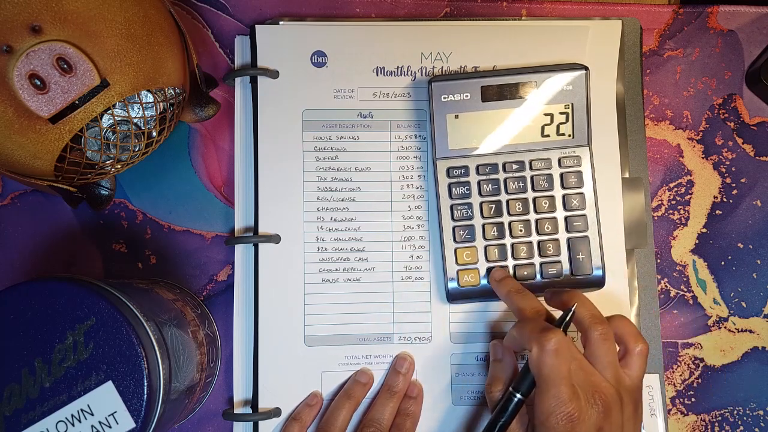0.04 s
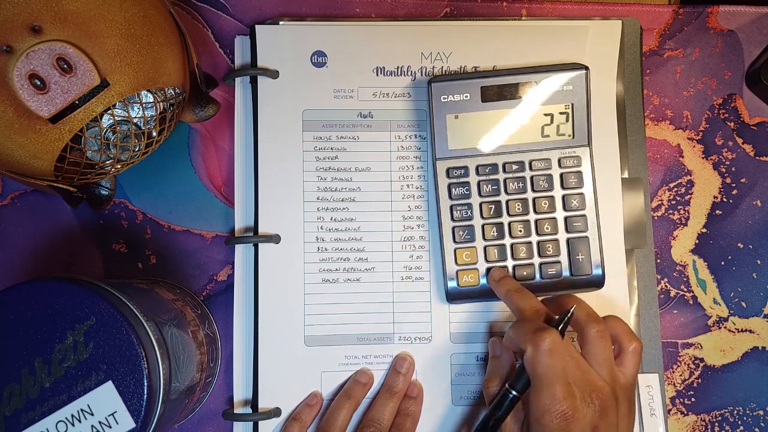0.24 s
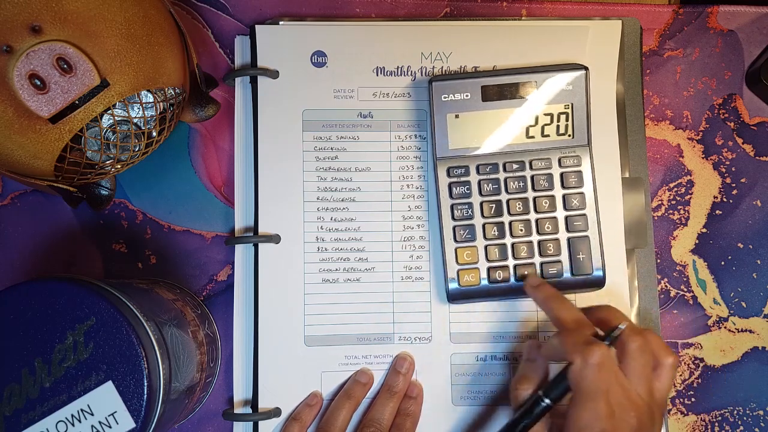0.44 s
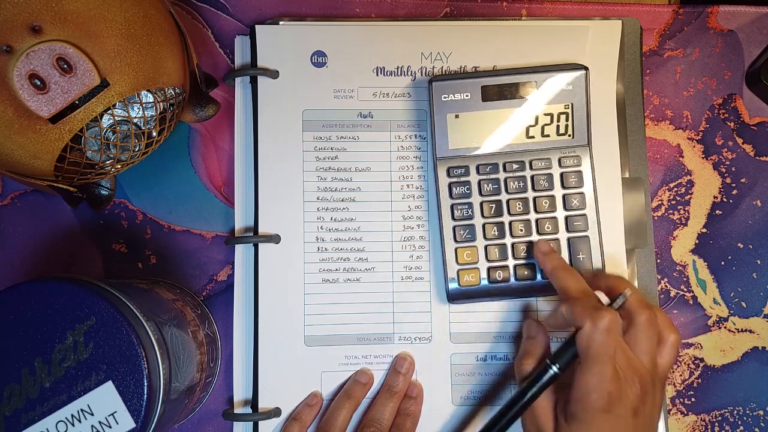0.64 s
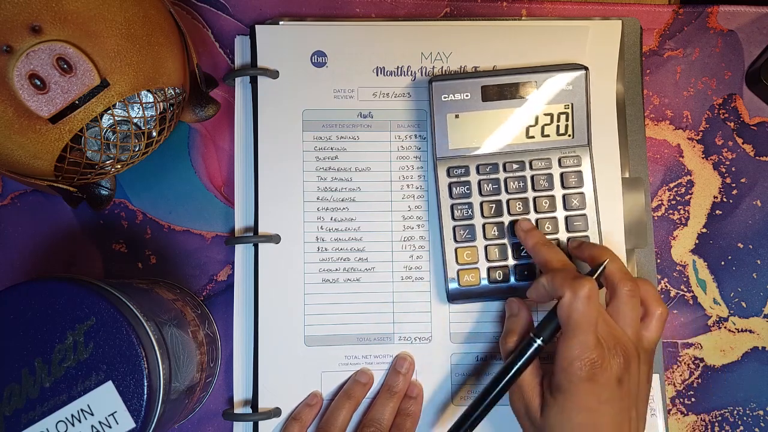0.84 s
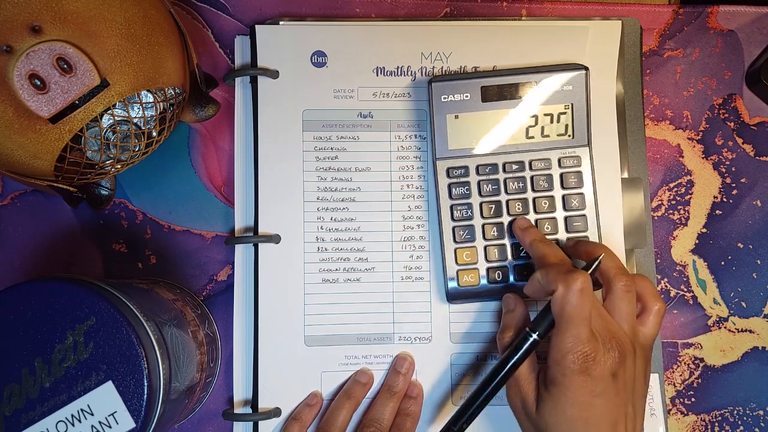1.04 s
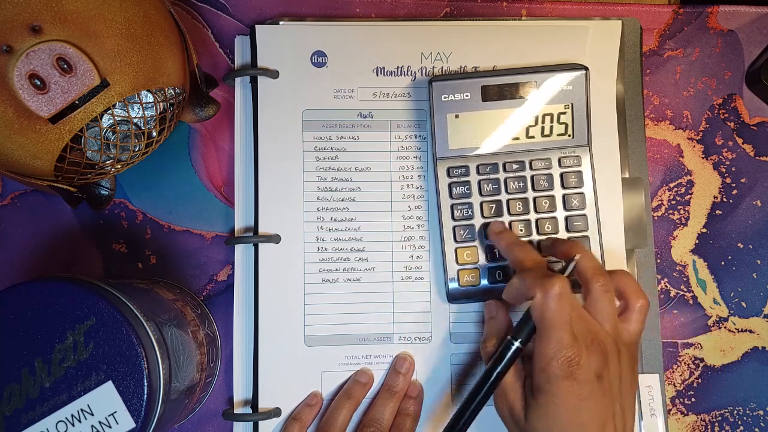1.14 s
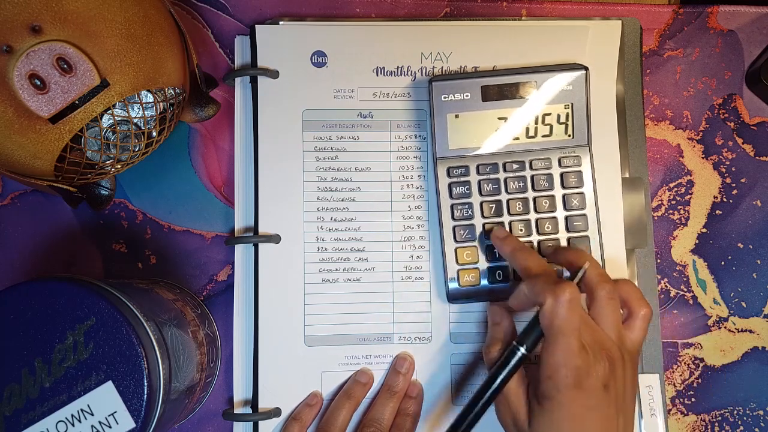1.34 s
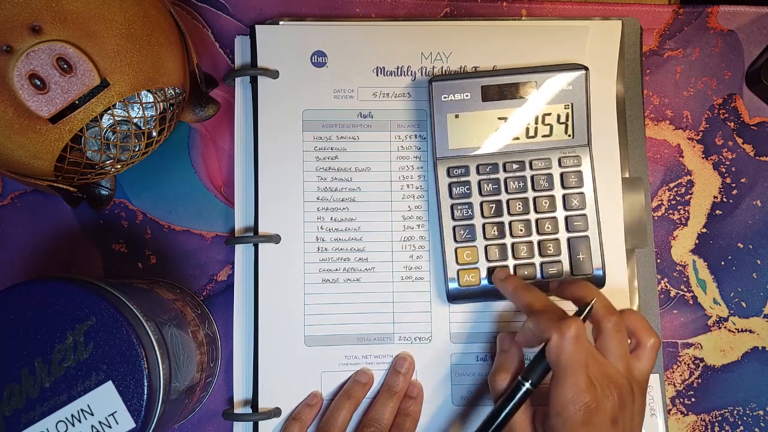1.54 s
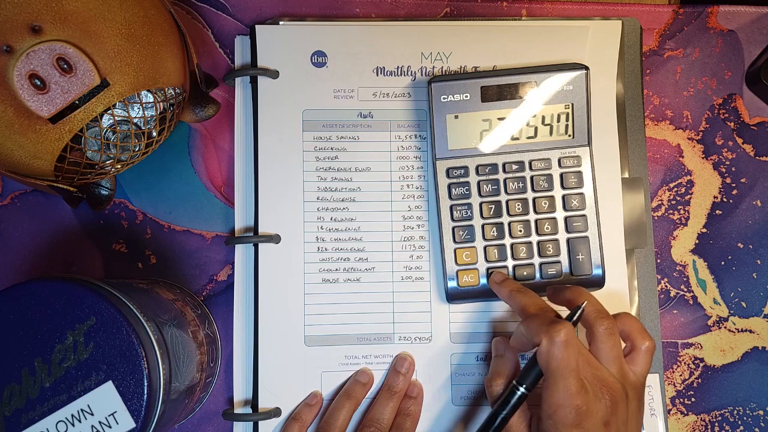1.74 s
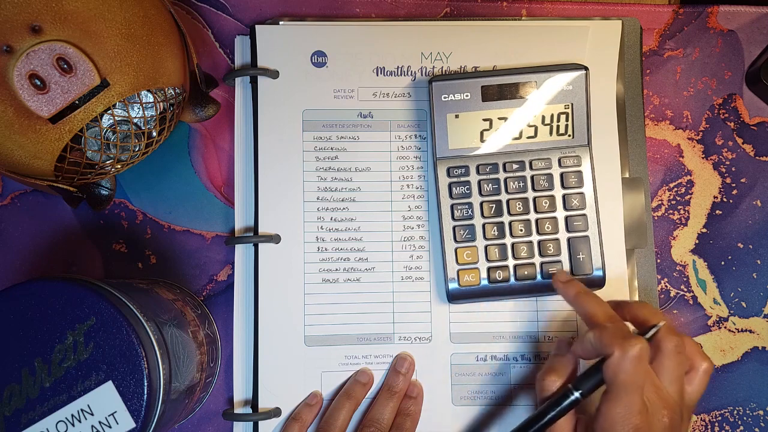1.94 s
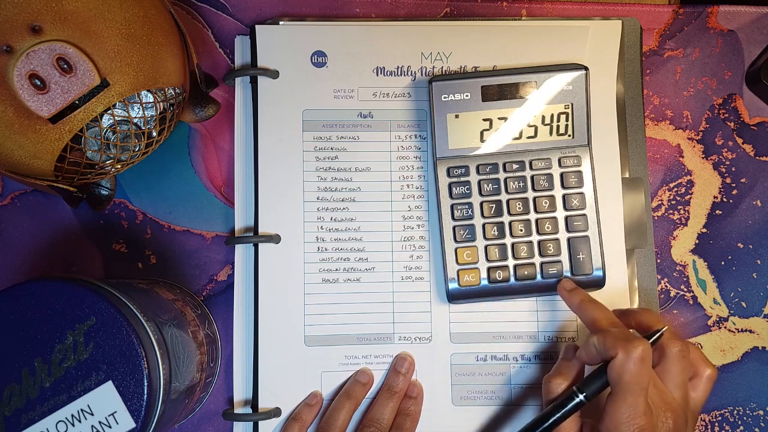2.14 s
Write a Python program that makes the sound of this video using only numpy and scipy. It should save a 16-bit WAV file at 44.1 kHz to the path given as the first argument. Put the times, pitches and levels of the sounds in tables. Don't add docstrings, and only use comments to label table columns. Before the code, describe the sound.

Fingers press the keys of a desktop calculator: four short plastic clicks with hollow knocks and soft low thumps, a pause after the first, then quicker presses; small quiet room, close phone microphone, faint hiss.

```python
import sys
import numpy as np
from scipy import signal
from scipy.fft import rfft, irfft
from scipy.io import wavfile
from scipy.ndimage import uniform_filter1d

SR = 44100
rng = np.random.default_rng(int(sys.argv[2]) if len(sys.argv) > 2 else 0)


def field_ratio(decibels):
    return 10 ** (np.asarray(decibels, dtype=float) / 20)


def bounce(signal):
    frames = np.transpose(np.atleast_2d(signal))
    limited = np.clip(frames, -1, 1)
    pcm = np.round(limited * 32767).astype(np.int16)
    wavfile.write(sys.argv[1], SR, pcm)


N = 97020


def read(points, hz):
    f, value = np.transpose(points)
    return np.interp(np.log(hz + 1), np.log(f + 1), value)


def evened(x):
    return x / np.sqrt(np.mean(x ** 2) + 1e-20)


def add(mix, s, sound):
    part = mix[round(s * SR):][:len(sound)]
    part += sound[:len(part)]


def colour(x, points):
    hz = np.fft.rfftfreq(x.shape[-1], 1 / SR)
    return irfft(rfft(x) * field_ratio(read(points, hz)), x.shape[-1])


def ring(hz, db, t60, t):
    return field_ratio(db - 60 * t / max(t60, .001)) * np.sin(2 * np.pi * hz * t)


# (frequency [Hz], level [dB])
HISS_COLOUR = [(88, -34), (150, 1), (193, -23), (314, -13.5), (530, -18), (595, -17.5), (1540, -28),
               (3910, -28.5), (15500, -31)]


def hiss():
    noise = rng.standard_normal(N)
    return field_ratio(-73.5) * evened(colour(noise, [(60, -85)] + HISS_COLOUR))


# (frequency [Hz], width [Hz], level [dB])
FAN_WHINES = [(5120, 980, -82), (3930, 110, -90)]


def fan_whine():
    hz = np.fft.rfftfreq(N, 1 / SR)
    out = np.zeros(N)
    for f, width, db in FAN_WHINES:
        band = rfft(rng.standard_normal(N)) / (1 + ((hz - f) / width) ** 2)
        out += field_ratio(db) * evened(irfft(band, N))
    return out


# (time [s], spread [s], level [dB], frequency [Hz])
RUSTLES = [
    (0.148, 0.044, -76.5, 876),
    (.43, 0.055, -66.5, 390),
    (1.27, 0.076, -61, 390),
]


def paper_rustle():
    t = np.arange(N) / SR
    out = np.zeros(N)
    for s, spread, db, f in RUSTLES:
        grain = rng.standard_normal(N) * np.exp(-((t - s) / spread) ** 2)
        band = signal.butter(2, [f * 0.38, f * 1.27], "band", fs=SR)
        out += field_ratio(db) * 5 * signal.lfilter(*band, grain)
    return out


# (time [s], effort [dB])
HAND_EFFORT = [(0, -65.5), (.12, -58.5), (.3, -51.5), (0.498, -48.5), (.6, -61), (.75, -59), (.95, -64),
               (1.099, -49.5), (1.4, -46.5), (1.598, -54.5), (1.801, -46), (2, -53.5), (2.2, -58)]
# (frequency [Hz], level [dB])
HAND_COLOUR = [(25, -5.5), (60, -5.5), (90, 4), (120, -1), (150, -12.5), (250, -18), (500, -39.5),
               (1500, -43.5)]


def shifting_hands():
    s, effort_db = np.transpose(HAND_EFFORT)
    noise = rng.standard_normal(N)
    rumble = evened(colour(noise, [(19, -20.5)] + HAND_COLOUR + [(4000, -65.5)]))
    return field_ratio(np.interp(np.arange(N) / SR, s, effort_db)) * rumble


def background():
    return hiss() + fan_whine() + paper_rustle() + shifting_hands()


# (frequency [Hz], level [dB], t60 [s])
DESK_LOW = [(85.7, 7, 0.27), (62.2, -8, 1), (35.2, -24.5, 0.49)]
DESK_HIGH = [(118.62, 5, 0.48), (171, -27.5, 0.29), (231.5, -13, 0.27)]
CONTACT_S = 0.0063
HOLD_S, LIFT_DB_PER_S = 0.158, 503


def push(way, low_db, high_db, share):
    t = np.arange(SR // 2) / SR
    force = np.sin(np.pi * np.clip(t[:2000] / CONTACT_S, 0, 1)) ** 2
    high = sum(ring(f, high_db + d, t60 * share, t) for f, d, t60 in DESK_HIGH)
    low = sum(ring(f, low_db + d, t60 * share, t) for f, d, t60 in DESK_LOW)
    stilled = field_ratio(-LIFT_DB_PER_S * np.maximum(t - HOLD_S * share, 0))
    return np.sign(way) * signal.fftconvolve(force / force.sum(), (high - low) * stilled)


# (time [s], direction [+1 or -1], low tones [dB], high tones [dB], ring time [share of t60])
DESK_PUSHES = [(0.202, 1, -44, -50, 1.28), (0.223, 1, -46, -51, 0.35), (0.344, 1, -61, -45, 1),
               (0.391, 1, -33.5, -28, 0.85), (0.801, 1, -56.5, -78, 2.1), (0.987, 1, -65, -53.5, 1),
               (1.0147, 1, -43, -40, 0.85), (1.13, 1, -33.5, -35.5, 0.42), (1.174, 1, -44, -54, 0.64),
               (1.20, 1, -38.5, -53, 0.36), (1.250, -1, -51, -31, 1.01), (1.3859, 1, -32.5, -31.5, .8),
               (1.655, 1, -45, -40, 0.93), (1.702, 1, -46, -50, 0.71), (1.795, 1, -47, -51, 0.76),
               (1.819, 1, -31.5, -29.5, 0.86)]


def desk_thumps():
    desk = np.zeros(N)
    for s, *settings in DESK_PUSHES:
        add(desk, s, push(*settings))
    return signal.lfilter(*signal.butter(2, 37.4, "high", fs=SR), desk)


# (frequency [Hz], level [dB], t60 [s])
KEY_TONES = [(1500, -5, .007), (2050, -5, .006), (2650, -5, .005), (3200, 0, .007), (3600, -2, .006),
             (4120, 0, .007), (4650, -6, .004), (5200, 0, .007), (5850, -5, .004), (6500, -5, .005),
             (7200, -5, .004), (8150, -6, .004), (9400, -10, .003), (12000, -8, .002)]
TICK_RISE_S, DETUNE = 0.0002, .012
RATTLE_SHARE, SCRAPE_S = 0.13, 0.018


def tick(db, hz, rattle, reach, chance):
    t = np.arange(1024) / SR
    hits = chance[:1024] ** 3 * (t < rattle) * RATTLE_SHARE
    hits[0] = np.exp(-(rattle / SCRAPE_S) ** 2)
    body = np.zeros(len(t))
    for k, (f, d, t60) in enumerate(KEY_TONES):
        tuned = f * (1 + DETUNE * chance[-k - 1])
        level = d - 6 * (np.log2(f / hz) / reach) ** 2
        body += ring(tuned, level, t60, t) * np.sign(chance[-k - 20])
    sound = signal.fftconvolve(hits, body * (1 - np.exp(-t / TICK_RISE_S)))
    return field_ratio(db) * sound / abs(sound).max()


# (time [s], level [dB], brightness [Hz], rattle [s], reach [octaves])
KEY_TICKS = [(0.2165, -42.5, 5000, .0012, 0.63), (0.231, -55, 3550, 0.012, 0.22),
             (.328, -53, 3550, 0.019, 0.47), (0.3417, -33.5, 3550, 0.00075, 0.38),
             (0.3468, -32, 4020, 0.0032, 1.06), (0.9797, -46, 2670, 0.00076, 0.76),
             (1.0861, -45, 3260, 0.0051, 0.98), (1.0911, -48, 3000, 0.0026, .9),
             (1.0986, -34, 2960, 0.00071, 0.68), (1.23, -57, 1400, 0.008, 0.23),
             (1.2419, -41.5, 2310, 0.00052, 0.47), (1.262, -55, 4700, 0.012, 0.97),
             (1.338, -39, 3900, 0.0065, 1.1), (1.3496, -29, 3450, .0009, 0.74),
             (1.6549, -52.5, 4330, 0.002, 0.55), (1.7745, -34.5, 3630, .0012, 0.54),
             (1.7785, -28, 4280, .002, 0.91)]


def key_ticks():
    keys = np.zeros(N)
    chance = rng.standard_normal((30, 1100))
    for (s, *settings), pattern in zip(KEY_TICKS, chance):
        add(keys, s, tick(*settings, pattern))
    return keys


# (frequency [Hz], t60 [s])
TAIL_TIMES = [(500, .3), (1500, 0.25), (4000, 0.32), (8000, 0.29), (14000, 0.72)]
# (frequency [Hz], level [dB])
ROOM_COLOUR = [(1000, 3.5), (2000, 8), (2600, 3), (4000, 1.5), (6200, -2), (8200, -1), (15000, 2.5)]
TAIL_RISE_S = 0.0032
WALL_S, WALL_DB, WALL_SPREAD_S = 0.026, -4, 0.002
EDGE_SHARE, CASE_OCT, EDGE_ORDER = .76, .3, 12
SHELF_DB = -21
LUMPY_DB = 3


def room(tilt_db=0, case_db=0, case_hz=600, top_hz=9000):
    t = np.arange(SR // 2) / SR
    wall = field_ratio(WALL_DB) * np.exp(-((t - WALL_S) / WALL_SPREAD_S) ** 2)
    shape = (1 - np.exp(-t / TAIL_RISE_S)) * (1 + wall)
    hz, at, z = signal.stft(rng.standard_normal(len(t)), SR, nperseg=256)
    hz = hz[:, None] + 1
    bump = case_db * np.exp(-(np.log2(hz / case_hz) / CASE_OCT) ** 2)
    db = read(ROOM_COLOUR, hz) + tilt_db * np.log2(hz / 2000) + bump
    z = z * field_ratio(db - 60 * at / read(TAIL_TIMES, hz))
    z = z / np.sqrt(1 + (EDGE_SHARE * case_hz / hz) ** EDGE_ORDER)
    z = z * (field_ratio(SHELF_DB) + 1 / np.sqrt(1 + (hz / top_hz) ** (2 * EDGE_ORDER)))
    lumps = evened(uniform_filter1d(rng.standard_normal(z.shape), size=12, axis=0))
    z = z * field_ratio(LUMPY_DB * lumps)
    tail = shape * signal.istft(z, SR, nperseg=256)[1][:len(t)]
    return tail / np.sqrt(np.mean(tail[:2000] ** 2))


# (time [s], level [dB], tilt [dB per octave], case share [dB], case pitch [Hz])
ROOM_ANSWERS = [
    (.2172, -65, 4.5, 24, 806),
    (.345, -52, -0.5, 7.5, 1130),
    (0.981, -64.5, -1.3, -12, 1300),
    (1.092, -56, -1.5, 2.5, 1130),
    (1.2411, -53.5, -5.5, 7.5, 945),
    (1.345, -52, -0.5, 3, 1200),
    (1.6571, -68, 5.8, 16, 1080),
    (1.776, -49, 0.5, 12.5, 1130),
]
TOP_HZ, TOP_OCT_PER_DB = 8300, .022


def room_answers():
    wet = np.zeros(N)
    for s, db, *settings in ROOM_ANSWERS:
        top_hz = TOP_HZ * 2 ** (TOP_OCT_PER_DB * (db + 49))
        add(wet, s, field_ratio(db) * room(*settings, top_hz))
    return wet


# (frequency [ratio to its pitch], level [dB])
CASE_TONES = [(1, 0), (1.2, -7), (1.7, -8), (.3, -16)]
KNOCK_RISE_S = 0.00082


def knock(db, hz, t60):
    t = np.arange(4096) / SR
    tones = sum(ring(hz * ratio, db + d, t60, t) for ratio, d in CASE_TONES)
    return (1 - np.exp(-t / KNOCK_RISE_S)) * tones


# (time [s], level [dB], pitch [Hz], t60 [s])
CASE_KNOCKS = [
    (.219, -55, 804, 0.022),
    (.349, -39.5, 1367, 0.021),
    (0.98, -59.5, 1216, 0.051),
    (1.089, -47, 1190, .02),
    (1.098, -44.5, 1200, 0.011),
    (1.2438, -39, 885, 0.039),
    (1.3492, -30.5, 1206, 0.016),
    (1.655, -60.5, 1170, 0.025),
    (1.7783, -34, 1223, 0.017),
]


def case_knocks():
    case = np.zeros(N)
    for s, *settings in CASE_KNOCKS:
        add(case, s, knock(*settings))
    return case


# (frequency [Hz], level [dB])
SIDE_COLOUR = [(100, -48.5), (300, -34), (700, -24), (1500, -19.5), (3000, -9), (8000, -7.5), (11500, -8),
               (13000, -27)]
ECHO_DB = -16


def scene():
    keys = key_ticks() + case_knocks()
    wet = room_answers()
    echo = room()
    keys = keys + field_ratio(ECHO_DB) * signal.fftconvolve(keys, echo / np.linalg.norm(echo))[:N]
    mid = keys + wet + desk_thumps() + background()
    side = colour(background(), SIDE_COLOUR)
    return np.array([mid + side, mid - side])


def roll_off(x):
    return signal.sosfilt(signal.butter(12, 15840, fs=SR, output="sos"), x)


def record(dry):
    return roll_off(dry)


dry = scene()
out = record(dry)
bounce(out)
```